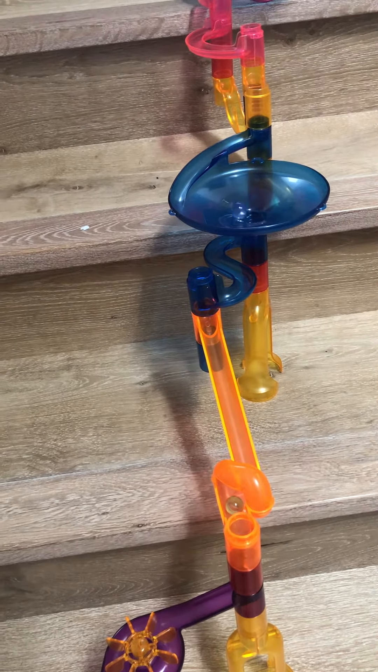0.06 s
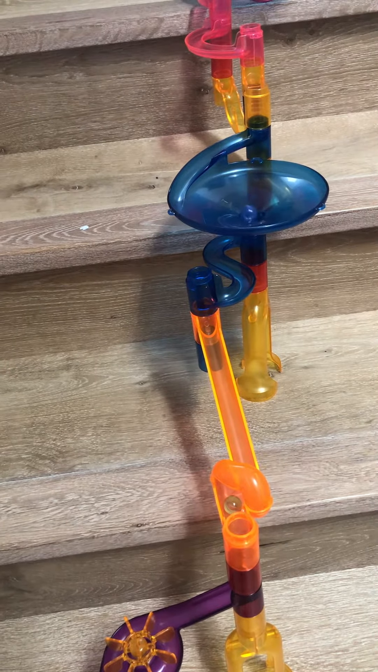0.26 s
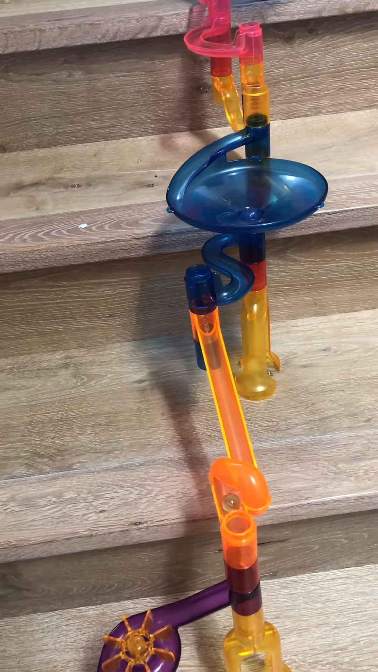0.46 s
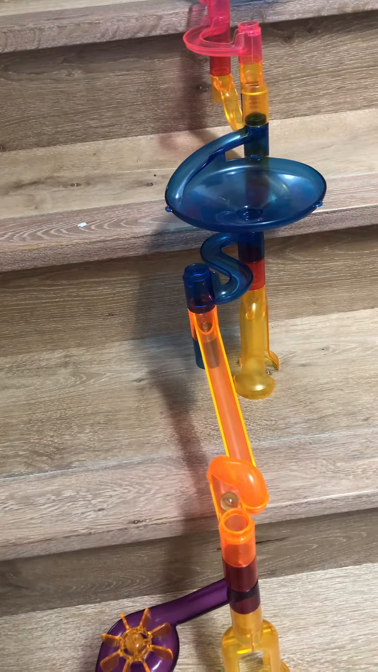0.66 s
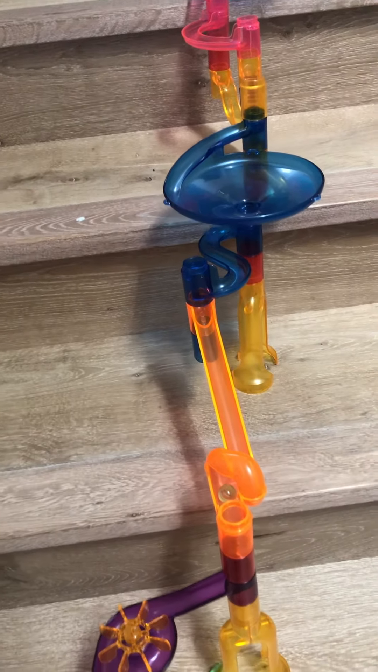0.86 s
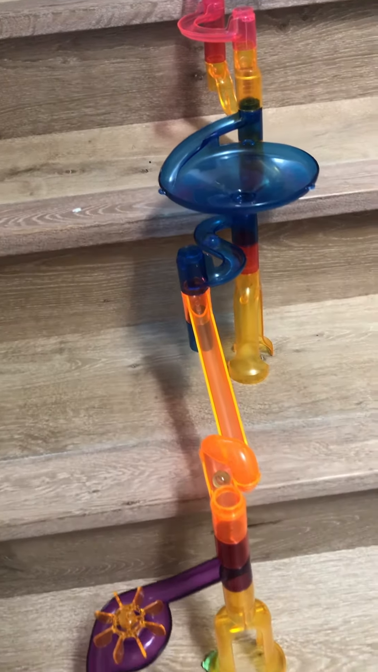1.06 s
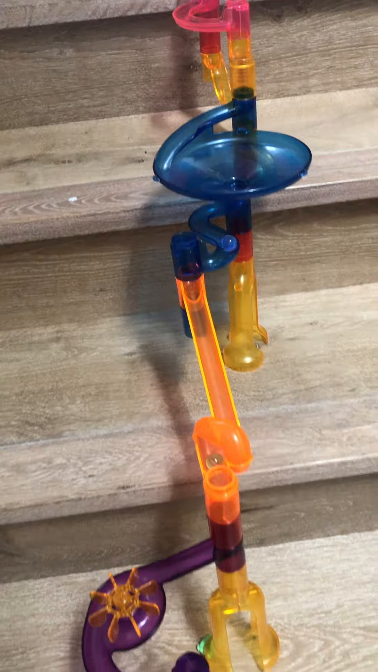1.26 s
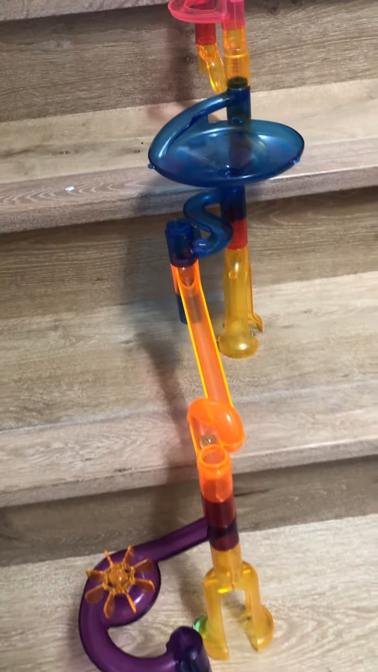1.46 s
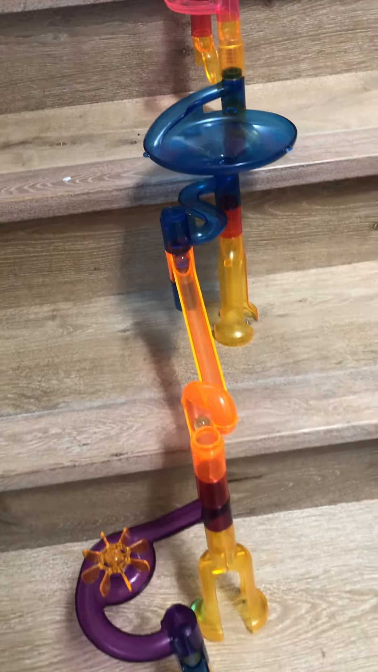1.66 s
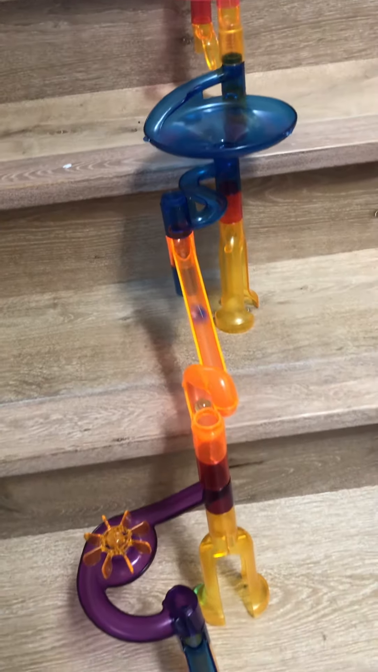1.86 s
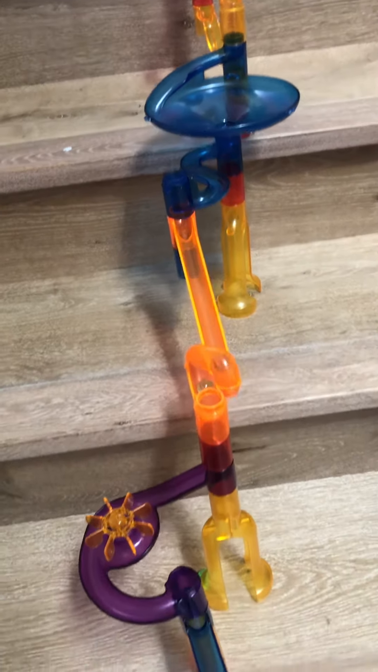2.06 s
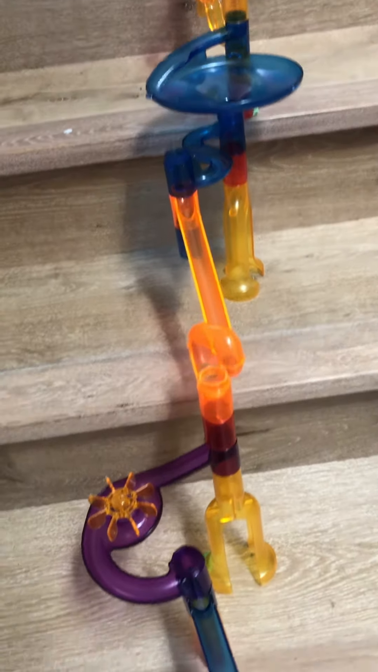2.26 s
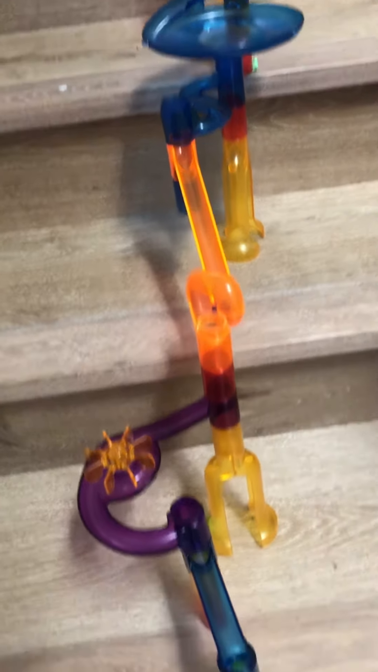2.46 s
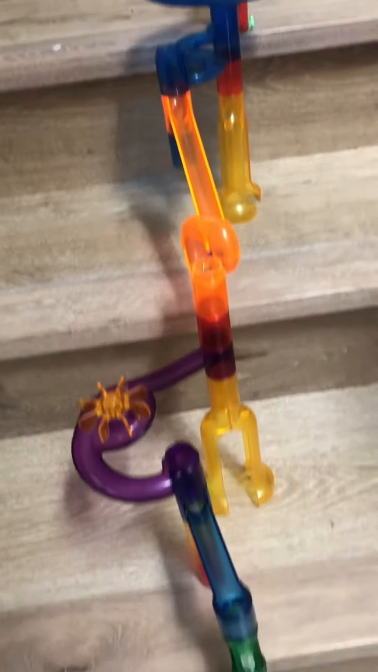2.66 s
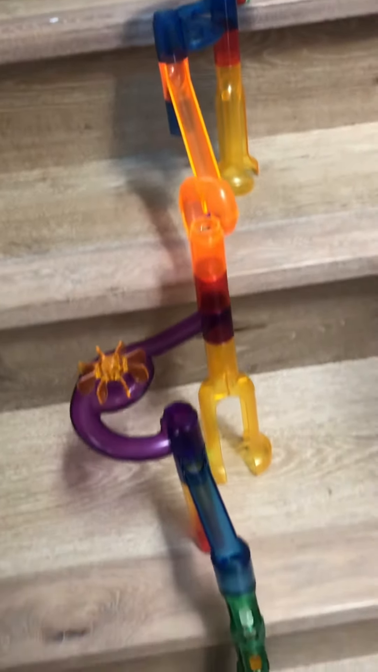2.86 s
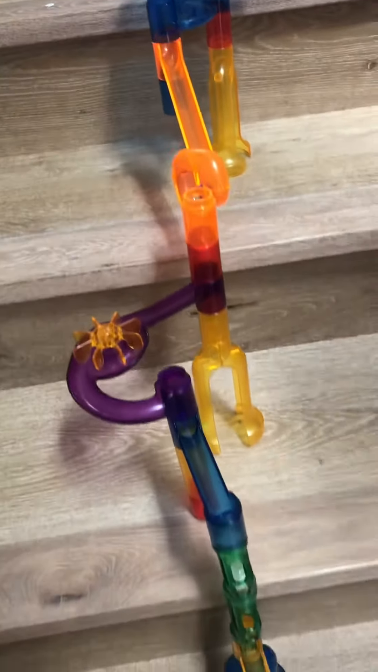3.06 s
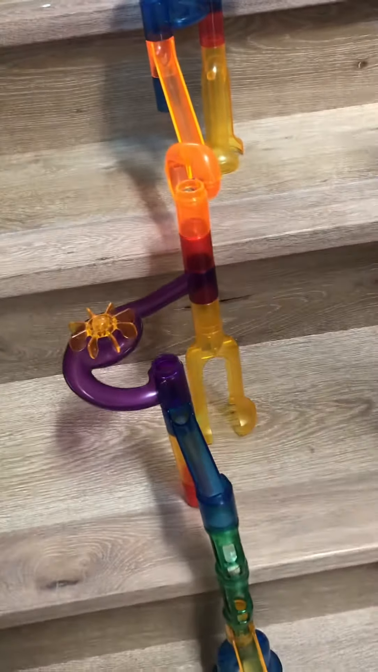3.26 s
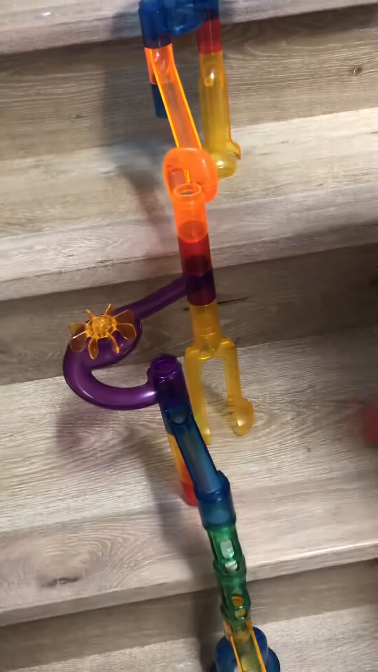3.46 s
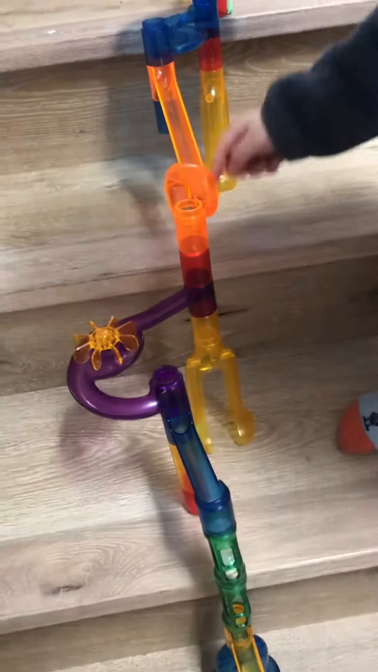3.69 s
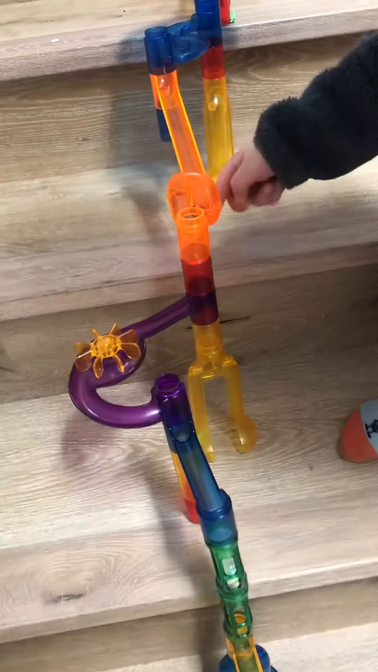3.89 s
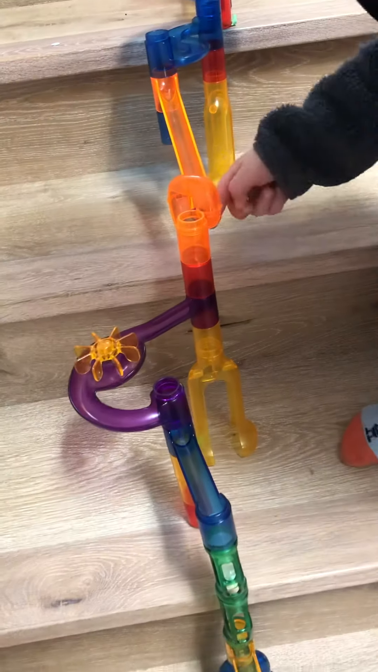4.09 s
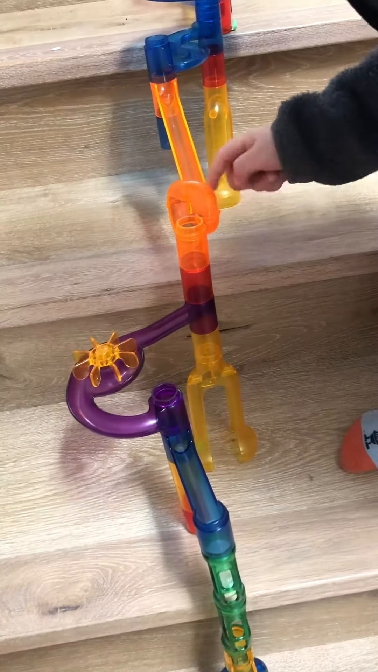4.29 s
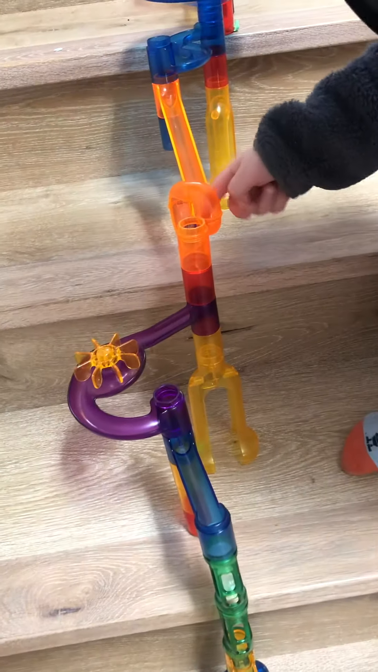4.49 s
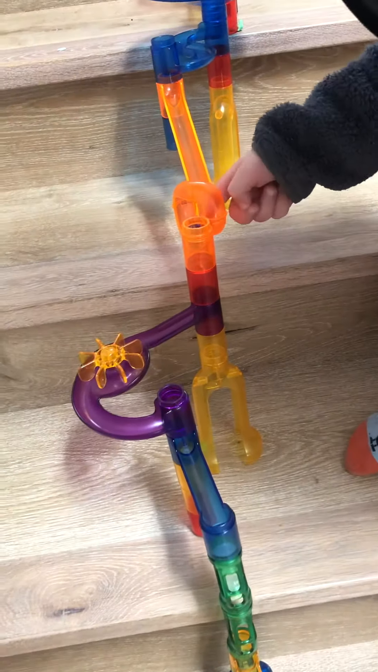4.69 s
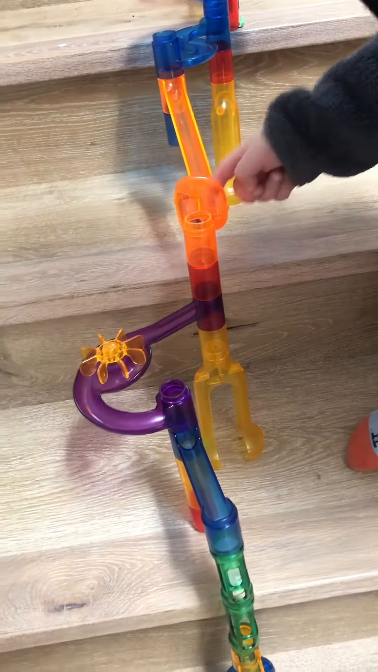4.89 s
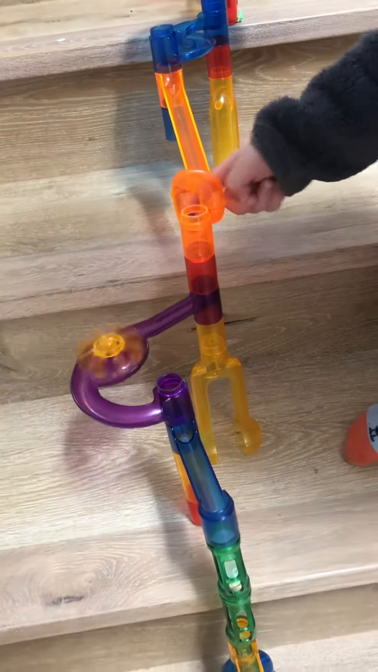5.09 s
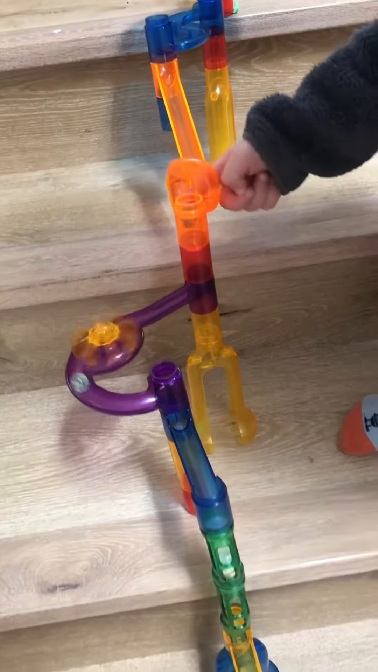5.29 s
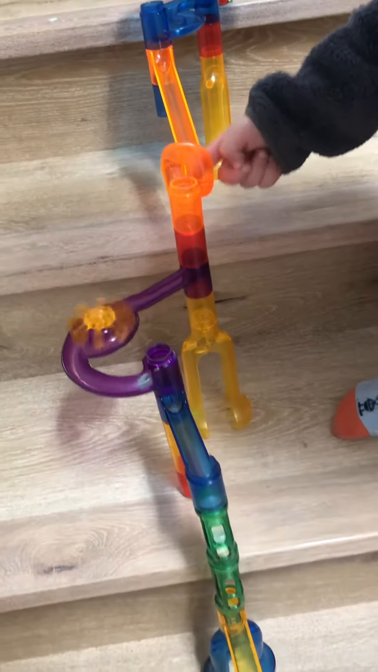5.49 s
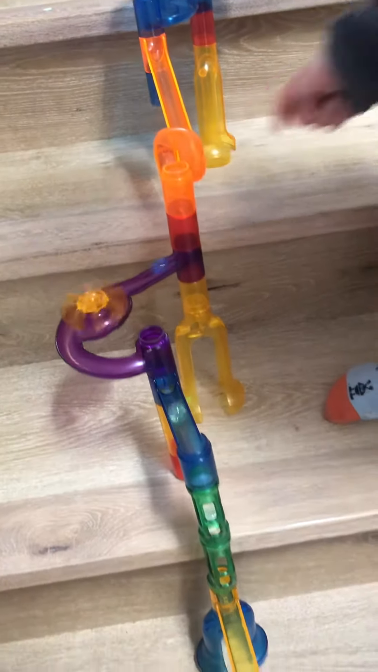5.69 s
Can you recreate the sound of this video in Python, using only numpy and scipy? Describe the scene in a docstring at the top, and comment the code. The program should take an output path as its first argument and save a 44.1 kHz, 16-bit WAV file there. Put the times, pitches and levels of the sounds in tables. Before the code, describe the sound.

A glass marble whirs and clacks down a plastic marble run, falls silent when stuck, then clatters onward after a quiet pause.

```python
"""A glass marble runs down a plastic marble run on wooden stairs. It whirs round a funnel, rattles down
tubes and sticks on a ramp, then, freed with a finger, clatters on through a paddle wheel and a curved chute.
Each clack is shaped noise ringing the plastic, with a low boom from the tower; rolling is noisy bumps
ringing the same pieces. While the marble is stuck, someone steps up: soft low pushes, a rumble of the
stairs, a rustle of cloth and faint taps. A short echo and a quiet bed of air lie behind."""
import sys
import numpy as np
from scipy import signal
from scipy.fft import rfft, irfft, next_fast_len
from scipy.io import wavfile
from scipy.ndimage import uniform_filter1d, map_coordinates

SR = 44100
rng = np.random.default_rng(int(sys.argv[2]) if len(sys.argv) > 2 else 0)


def generate_wav(signal):
    """Clip the signal to [-1, 1] and save it as 16-bit WAV at the path in sys.argv[1]."""
    frames = np.transpose(np.atleast_2d(signal))
    scaled = np.clip(frames, -1, 1) * 32767
    pcm = np.round(scaled).astype(np.int16)
    wavfile.write(sys.argv[1], SR, pcm)


N = 253123  # length in samples

# Resonances of each piece of track: pitch_hz, width_hz (plastic() widens it), level_db
FUNNEL = [(564.2, 70, -16), (900, 27, -3.5), (1434, 31, -1.5), (1567, 62, 0.5), (1690, 58, 2),
          (1780, 50, 2.5), (2260, 87, -9), (2600, 50, -1), (3236, 110, -2.5), (3493, 70, -8),
          (3950, 120, -23.5), (5250, 220, -15.5), (6916, 350, -19.5), (15200, 900, -16.5)]
SNAKE = [(1435, 66, 0), (1770, 82, -4.5), (2562, 99, 2.5), (3120, 110, -8.5), (3430, 35, -4.5),
         (4020, 53, -8), (4200, 71, -14.5), (4854, 230, -9.5), (8110, 86, -16.5), (8400, 120, -11.5)]
RAMP = [(1324, 110, -5.5), (1790, 71, -5), (2280, 130, -4), (2523, 300, -3), (3160, 130, -4.5),
        (3460, 54, -11.5), (4480, 260, -9.5), (6140, 61, -15), (6960, 170, -10.5), (7520, 90, -8.5),
        (8800, 170, -17)]
WHEEL = [(1780, 120, -8), (2475, 35, -2), (3350, 66, -14), (3850, 56, -9), (4350, 130, -8.5),
         (4900, 110, -12.5), (5360, 120, -7.5), (6080, 46, -9.5), (7120, 69, -6.5), (9340, 89, -9.5)]
CHUTE = [(1060, 92, -10.5), (1360, 29, -6.5), (1690, 190, -9.5), (2634, 130, -0.5), (3360, 45, -8),
         (3740, 100, -9), (4110, 320, -6), (5300, 90, -20), (6210, 110, -8.5), (7540, 85.6, -12),
         (8840, 110, -11.5)]
# The way down, for blows and rolling: arrival_s, piece, tower_boom_hz, boom_db, track_tone_hz, tone_db
ROUTE = [(0, FUNNEL, 215, -11.5, 900, -17.5), (1.2, SNAKE, 202.4, -16, 2600, -0.5),
         (1.801, RAMP, 192.8, -17, 2344, -7), (4.0, WHEEL, 178.2, -18.5, 1690, -8),
         (5.3, CHUTE, 185.8, -20.5, 2420, -14), (5.66, CHUTE, 186, -18, 1060, 3)]
# The marble strikes the plastic: start_s, strength_db, hardness_db
CLACKS = [ (0.141, -43.5, -18), (0.323, -33.5, -3), (0.4356, -26, 1.5), (0.4502, -29.5, 0),
          (0.4768, -34.5, 1), (0.503, -32.5, 2), (0.5227, -26, 1), (0.5297, -13.5, 4), (0.5429, -21, 8),
          (0.5619, -18, 2.5), (0.605, -20.5, 1), (0.638, -22, 0.5), (0.6621, -26, -1), (0.676, -40.5, -19),
          (0.7138, -34.5, 2.5), (0.9652, -42.5, 4), (1.256, -44, 1.5), (1.4765, -47, -17.5),
          (1.533, -43, -25), (1.5586, -12.5, -2), (1.5798, -23.5, -2), (1.607, -15, 1), (1.6275, -21, -10),
          (1.642, -16.5, -1), (1.675, -24.5, -6.5), (1.8496, -40, -2.5), (1.9346, -35.5, -14),
          (1.9609, -29.5, -8), (1.9745, -12, 0.5), (1.9932, -12.5, 1), (2.1103, -12.5, 3),
          (2.139, -11, 3.5), (2.156, -18.5, -4), (2.3399, -29.5, -10), (2.3615, -31.5, -9.5),
          (2.3699, -28.5, 1), (2.4195, -28, -4.5), (2.492, -43, -8.5), (2.546, -48, 10), (4.8403, -29, -13),
          (4.8797, -22.5, -4.5), (4.8964, -10.5, -5.5), (4.955, -33.5, 12), (4.9725, -21, 0.5),
          (4.979, -19.5, 4.5), (5.01, -20.5, -12.5), (5.041, -17.5, 5.5), (5.059, -26.5, 8),
          (5.072, -28.5, 7), (5.345, -38, -23), (5.4001, -28, -5), (5.443, -8, -2.5), (5.4508, -8.5, 1),
          (5.4615, -20, 3), (5.4869, -7.5, 1), (5.4948, -22, 5), (5.5483, -12, 3), (5.569, -23, -3),
          (5.5786, -24.5, 4), (5.5976, -12, -2.5), (5.629, -21, -3), (5.671, -32.5, -8)]
# How each part answers a blow, against the clack: arrival_s, knock_db, hollow_ring_db, snap_db
ANSWERS = [(0, 2, -12, -14), (1.2, -11, -6, -14.5), (1.8, -8, -4.5, -10), (4.0, -12, -10, -7),
           (5.3, -9.5, -4, -11), (5.42, -15, -11, -12), (5.56, -12.5, 0, -10.5)]
# A stronger blow clacks more and knocks less: dB per dB of strength for clack, knock, ring, snap
STIFFENING = [0.096, -0.12, -0.08, 0.1]
USUAL_DB = -24  # strength of an ordinary blow
# A hard blow, one row each for clack, knock, ring, snap: trim_db, rise_s, hold_s, t60_s (time to fall 60 dB)
HARD = [(-9, 0.00026, 0.0033, 0.031), (-0.5, 0.0022, 0.0037, 0.04), (-4.5, 0.00022, 0.0044, 0.027),
        (-3.5, .0001, 0.0023, 0.031)]


def clacks(boom_db=-13, knock_share=0.35):
    """The marble bounces down the run; each blow rings the plastic and also rocks the tower."""
    out = np.zeros(N)
    for s, db, hardness_db in CLACKS:
        _, piece, pitch_hz, sway_db, *_ = [stage for stage in ROUTE if stage[0] <= s][-1]
        _, *answer_db = [part for part in ANSWERS if part[0] <= s][-1]
        levels_db = band_levels(db, hardness_db, answer_db)
        levels_db = levels_db + (db - USUAL_DB) * np.array(STIFFENING)
        add(out, s, strike(levels_db, piece, HARD, linger_db=-23.5, linger_t60=0.15))
        # The boom follows partly the knock, partly the whole blow
        force_db = knock_share * levels_db[1] + (1 - knock_share) * db
        add(out, s, amp(force_db + sway_db + boom_db) * boom(pitch_hz))
    return out


# A harder contact is shorter, so it snaps more and knocks less:
# dB per dB of hardness for clack, knock, ring, snap
HARDENING = [0, -0.2, -0.52, 0.99]


def band_levels(db, hardness_db, answer_db):
    """Levels in dB of the clack, knock, hollow ring and snap of one blow."""
    return db + hardness_db * np.array(HARDENING) + np.array([0, *answer_db])


# The parts of a blow, in the order clack, knock, ring, snap: low_hz, high_hz
BANDS = [(3000, 6000), (300, 2100), (2100, 3000), (6000, 17000)]


def strike(levels_db, piece, blow, linger_db, linger_t60, crack_db=7, crack_s=0.0007):
    """One contact: a crack, then bending waves fill the piece for a few ms and die; a faint ring of the piece
    lingers on."""
    t = np.arange(SR // 7) / SR
    out = np.zeros(len(t))
    for band, db, (trim_db, rise, hold, t60) in zip(BANDS, levels_db, blow):
        body = amp(-60 * np.maximum(t - hold, 0) / t60)
        linger = amp(linger_db - 60 * t / linger_t60)
        crack = amp(crack_db) * np.exp(-t / crack_s)
        fade = (body + linger + crack) * (1 - np.exp(-t / rise))
        ring = plastic(rng.standard_normal(len(t)) * fade, piece)
        band_filter = signal.butter(3, band, "bandpass", fs=SR, output="sos")
        ring = signal.sosfilt(band_filter, ring)
        loudness = np.sqrt(np.sum(ring ** 2) / (0.0045 * SR))  # as if all its energy fell in 4.5 ms
        out += amp(db + trim_db) * ring / loudness
    return out


# Dense, dead resonances of the thin plastic wall: pitch_hz, level_db
WALL = [(100, -48), (350, -19.5), (1000, -20), (2500, -9.5), (6000, -18.5), (11000, -16), (16000, -22.5)]


def plastic(x, piece, loss=0.0037):
    """A piece rings with its own modes over those of its thin wall; plastic damps high modes most."""
    damped = [(hz, width + loss * hz * hz / 4000, db) for hz, width, db in piece]
    return shaped(x, lambda hz: np.hypot(resonances(damped, hz), amp(along(WALL, hz))))


# The tower's modes: multiple of its boom pitch, level_db
TOWER = [(1, 6), (.8, -10), (.66, -16.5)]
# Thud of the step under the tower: pitch_hz, level_db
THUD = [(40, -38), (70, -19), (105, -3), (140, -4), (200, -0.5), (260, -8.5), (340, -7.5), (600, -12),
        (1200, -30), (3000, -56.5)]


def boom(pitch_hz, rise=.016, t60=0.29, detune=.04, thud_db=-3, thud_t60=0.23):
    """The step thuds, and the tower starts slowly to sway on it and hums out."""
    t = np.arange(SR // 2) / SR
    hum = np.zeros(len(t))
    for multiple, db in TOWER:
        hz = pitch_hz * multiple * (1 + detune * rng.standard_normal())
        hum += amp(db) * np.sin(2 * np.pi * (hz * t + rng.random()))
    thud = coloured(rng.standard_normal(len(t)), THUD)
    dying_hum = hum * amp(-60 * t / t60)
    dying_thud = thud * amp(thud_db - 60 * t / thud_t60)
    return (dying_hum + dying_thud) * (1 - np.exp(-t / rise))


# Force of a rolling marble: pitch_hz, level_db
CONTACT = [(100, -24.5), (300, 13), (900, 10), (1700, 5), (2700, -3), (4000, -9.5), (7000, -19),
           (16000, -38.5)]
# Force of a small hop: pitch_hz, level_db
LANDING = [(300, -24), (1500, -9), (3500, -1), (5200, 2), (7000, -6.5), (16000, -17)]
# The finest roughness, a high hiss: pitch_hz, level_db
GRIT = [(2500, -40.5), (5000, 2), (8000, 0), (15500, -8)]


def rolling(whir_db=-0.5, grit_db=-6.0, bumps_per_s=1100, smooth_db=-2, flutter_db=5.0, clump_db=5,
            skip_db=6.0, chatter_db=-32, scrape_db=-38):
    """The marble trips over tiny bumps, which ring whichever piece it is in, the air in it and the tower."""
    speed, rough = pace()
    shaken = unrest()
    bumps = (rng.random(N) < bumps_per_s / SR) * rng.standard_normal(N)
    pressure = unit(amp(flutter_db * np.tanh(wobble(70))))  # the marble presses unevenly on the track
    force = unit(unit(bumps) + amp(smooth_db) * rng.standard_normal(N)) * pressure
    contact = coloured(force, CONTACT)
    hops = coloured(skips(), LANDING)
    # It hops more on rough track, and just after a blow
    hopping = amp(skip_db) * rough + amp(chatter_db) * shaken
    arrivals = [stage[0] for stage in ROUTE]
    place = np.searchsorted(arrivals, np.arange(N) / SR, "right") - 1
    out = np.zeros(N)
    for k, (_, piece, boom_hz, boom_db, tone_hz, tone_db) in enumerate(ROUTE):
        whir = amp(whir_db) * unit(plastic(contact, piece))
        tower_hum = amp(boom_db) * narrow(force, boom_hz, width_hz=14)
        track_tone = amp(tone_db) * narrow(force, tone_hz, width_hz=30)
        rattle = hopping * unit(plastic(hops, piece))
        here = uniform_filter1d(1. * (place == k), size=800)  # soft crossfade between pieces
        out += (speed * (whir + tower_hum + track_tone) + rattle) * here
    clumps = unit(amp(clump_db * np.tanh(wobble(110))))  # the finest roughness comes in short scrapes
    grit = coloured(rng.standard_normal(N), GRIT) * clumps
    return out + (amp(grit_db) * rough + amp(scrape_db) * shaken) * grit


# Stretches where the marble steadily gains or loses speed:
# start_s, end_s, start_speed_db, end_speed_db, roughness_db (against the speed level)
ROLLS = [(0.0, 0.139, -62.5, -49, -42), (0.14, 0.421, -46, -44, -19.5), (0.43, 0.53, -46.5, -40.5, -6),
         (0.537, 0.7, -46.5, -47.5, -32), (0.7, 1.24, -47.5, -65.5, -24.5), (1.243, 1.44, -69.5, -64, -7.5),
         (1.44, 1.56, -57, -53, -20.5), (1.564, 1.857, -51, -52.5, -16.5), (1.842, 1.98, -44, -49, -12.5),
         (1.963, 2.358, -52, -53.5, -12.5), (2.36, 2.759, -58.5, -75.5, -14), (4.881, 5.03, -50, -53, -24),
         (5.041, 5.203, -37.5, -49, -20.5), (5.204, 5.434, -49, -54, -18),
         (5.455, 5.737, -42.5, -57, -13.5)]
ROLL_ATTACK_S, ROLL_RELEASE_S = 0.0049, 0.02  # the marble runs onto a stretch, and off it


def pace():
    """Gains of whir and roughness: on each stretch they follow the speed, changing evenly in dB."""
    t, whir, grit = np.arange(N) / SR, np.zeros(N), np.zeros(N)
    for start, end, start_db, end_db, grit_db in ROLLS:
        running_on = np.clip((t - start) / ROLL_ATTACK_S, 0, 1)
        running_off = np.clip(1 - (t - end) / ROLL_RELEASE_S, 0, 1)
        gain = running_on * running_off * amp(np.interp(t, [start, end], [start_db, end_db]))
        whir = np.maximum(whir, gain)
        grit = np.maximum(grit, gain * amp(grit_db))
    return whir, grit


SETTLE_S = 0.041  # after a blow the marble chatters on the track and calms down


def unrest():
    """How much the marble is still shaken: the energy of every blow dies away exponentially."""
    kicks = np.zeros(N)
    for s, db, _ in CLACKS:
        add(kicks, s, [amp(db) ** 2])
    return np.sqrt(dying(kicks, SETTLE_S / 2))


def skips(per_s=85, scatter_db=5, life_s=0.003):
    """Tiny ticks of dying noise at chance moments, at rms 1."""
    landings = (rng.random(N) < per_s / SR) * amp(scatter_db * np.tanh(rng.standard_normal(N)))
    return unit(dying(landings, life_s) * rng.standard_normal(N))


# Light taps of feet, clothes and fingers: start_s, strength_db, hardness_db
TAPS = [(3.0902, -55.5, 26.5), (3.3476, -64, 26), (3.4157, -42, 7), (3.491, -57, 22.5), (4.0498, -58.5, -6),
        (4.2491, -65.5, 6), (4.2928, -69, 21.5), (4.3196, -67.5, -12), (4.559, -50.5, 2.5),
        (4.7644, -54.5, -16), (4.7795, -63, -8)]
# Their balance against the clack: knock_db, hollow_ring_db, snap_db
TAP_ANSWER = (2.7, -11, -14)
# Their woody colour: pitch_hz, width_hz (plastic() widens it), level_db
TAPPED = [(500, 140, -10), (900, 240, 1), (1320, 77, -5), (2360, 550, -8), (3340, 600, -13)]
# A soft blow, one row each for clack, knock, ring, snap: trim_db, rise_s, hold_s, t60_s
SOFT = [(-7, 0.00045, 0.0021, 0.1), (-1.5, 0.0013, 0.0067, 0.076), (-9.5, 0.00026, 0.0052, 0.025),
        (-2, 0.0006, 0.0033, 0.098)]


def taps():
    """Faint, softer touches while the marble is stuck: the same kind of contact with a woody ring."""
    out = np.zeros(N)
    for s, db, hardness_db in TAPS:
        levels_db = band_levels(db, hardness_db, TAP_ANSWER)
        add(out, s, strike(levels_db, TAPPED, SOFT, linger_db=-8.5, linger_t60=0.15))
    return out


# Weight on the stairs: start_s, level_db, pitch_hz, stair_ring_db (against the push)
STEPS = [(3.106, -57, 127, 8.5), (3.159, -57.5, 90, 3), (3.419, -30.5, 152, -3), (3.469, -27, 132, -11)]
# Resonances of the staircase: pitch_hz, width_hz, level_db
STAIRS = [(44.5, 16, -8.5), (70.6, 8.3, 1), (112.6, 9.9, 1.5), (146.4, 10, 1), (211.3, 18.4, -12.5),
          (364, 19, -13.5)]
# Soft soles dull the blow: pitch_hz, level_db
TREAD = [(20, -36), (45, -6.5), (200, -5), (500, -11), (1500, -17), (4000, -9)]


def footsteps(push_width=0.0054, ring_t60=0.52, ring_rise=0.0072):
    """Heel and sole each push the tread once, a short low pulse, and the staircase rumbles on."""
    out, t = np.zeros(N), np.arange(SR) / SR
    for s, db, hz, ring_db in STEPS:
        u = t - 1.56 * push_width  # time from the peak of the push
        push = np.cos(2 * np.pi * hz * u) * np.exp(-(u / push_width) ** 2)
        noise = rng.standard_normal(len(t))
        ring = unit(shaped(noise, lambda f: resonances(STAIRS, f) * amp(along(TREAD, f))))
        ring_fade = (1 - np.exp(-t / ring_rise)) * amp(ring_db - 60 * t / ring_t60)
        add(out, s, amp(db) * (push + ring * ring_fade))
    return out


# Loudness of the clothes before its random flutter: time_s, level_db
RUSTLE = [(2.8, -81.5), (2.962, -68.5), (3.164, -61.5), (3.34, -64.5), (3.592, -68.5), (3.772, -71.5),
          (4.0, -96)]
# Tone of the cloth: pitch_hz, level_db
CLOTH = [(200, -4), (600, 5.5), (2000, 5), (5000, 4.5), (10000, -2), (15500, 0)]


def rustle(crinkle_db=-5):
    """Clothes rub and crinkle: noise with tiny ticks, its level fluttering slowly and quickly."""
    s, db = np.transpose(RUSTLE)
    level_db = np.interp(np.arange(N) / SR, s, db, left=-120, right=-120)
    flutter_db = 1.6 * wobble(28) + 1.3 * wobble(160)
    cloth = coloured(rng.standard_normal(N) + amp(crinkle_db) * skips(per_s=60), CLOTH)
    return amp(level_db + flutter_db) * cloth


# How long the echo lasts: pitch_hz, t60_s
STAIRWELL = [(150, 0.54), (700, 0.42), (1800, 0.32), (5000, 0.28), (13000, 0.25)]
# Tone of the echo: pitch_hz, level_db
ECHO = [(150, 14.5), (1500, 5.5), (3000, 3.5), (6000, -0.5), (15000, -8.5)]


def stairwell(x, build=0.0043):
    """Hard walls answer with a noisy tail whose treble dies first."""
    hz, t, z = signal.stft(rng.standard_normal(SR), SR, nperseg=256)
    fade = amp(-60 * t / along(STAIRWELL, hz)[:, None]) * (1 - np.exp(-t / build))
    tone = amp(along(ECHO, hz))[:, None]
    tail = signal.istft(z * fade * tone, SR, nperseg=256)[1]
    return signal.fftconvolve(x, tail / np.linalg.norm(tail))[:N]


# Tone of the background air: pitch_hz, level_db
AIR = [(15, -55), (25, -29.5), (64, 0.5), (87, -7), (145, -6), (242, -6.5), (416, -9), (624, -14.5),
       (2050, -26.5), (2350, -23.5), (3430, -27.5), (10700, -30.5), (16000, -34.5)]


def air():
    """Quiet, mostly low noise whose level drifts slowly."""
    return amp(-69 + 1.0 * wobble(2.5)) * coloured(rng.standard_normal(N), AIR)


def amp(db):
    """Decibels to gain."""
    return 10 ** (np.asarray(db) / 20)


def unit(x):
    """Scale to rms 1."""
    return x / np.sqrt(np.mean(x ** 2) + 1e-20)


def along(points, hz):
    """(Hz, value) points read on a log axis."""
    f, v = np.transpose(points)
    return np.interp(np.log(hz + 1), np.log(f + 1), v)


def wobble(rate):
    """A smooth random curve, rate knots a second."""
    knots = rng.standard_normal(int(N * rate / SR) + 4)
    return map_coordinates(knots, [np.arange(N) * rate / SR])


def add(track, s, sound):
    """Mix a sound into a track at time s."""
    part = track[max(round(s * SR), 0):][:len(sound)]
    part += sound[:len(part)]


def dying(kicks, life_s):
    """Every kick leaves an exponential decay."""
    return signal.lfilter([1], [1, -np.exp(-1 / (life_s * SR))], kicks)


def shaped(x, gain):
    """Causal (minimum-phase) filter whose magnitude is gain(Hz)."""
    m = 2 * next_fast_len(len(x))
    cepstrum = irfft(np.log(np.maximum(gain(np.fft.rfftfreq(m, 1 / SR)), 1e-6)))
    # Fold the cepstrum forward in time, so nothing sounds before its cause
    cepstrum[1:m // 2] *= 2
    cepstrum[m // 2 + 1:] = 0
    return irfft(rfft(x, m) * np.exp(rfft(cepstrum)))[:len(x)]


def coloured(x, spectrum):
    """x through a spectrum, at rms 1."""
    return unit(shaped(x, lambda hz: amp(along(spectrum, hz))))


def resonances(modes, hz):
    """Gain of a set of damped modes, their powers added."""
    power = 0
    for centre, width, db in modes:
        power = power + (amp(db) * hz * width) ** 2 / ((centre ** 2 - hz ** 2) ** 2 + (hz * width) ** 2)
    return np.sqrt(power)


def narrow(x, hz, width_hz):
    """One lightly damped resonance, at rms 1."""
    b, a = signal.iirpeak(hz, hz / width_hz, fs=SR)
    return unit(signal.lfilter(b, a, x))


def scene():
    """The marble run with its echo, the person on the stairs and the air."""
    run = clacks() + taps() + rolling()
    echo = amp(-13.5) * stairwell(run)
    return (run + echo + footsteps() + rustle() + air())[None]


TOP_HZ = 16300  # top of the treble


def record(dry):
    """A very steep filter removes the treble above TOP_HZ."""
    m = next_fast_len(N + SR // 2)
    passed = 1 / (1 + (np.fft.rfftfreq(m, 1 / SR) / TOP_HZ) ** 90)
    return irfft(rfft(dry, m) * passed, m)[..., :N]


dry = scene()
out = record(dry)
generate_wav(out)
```